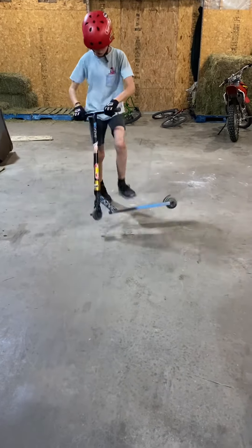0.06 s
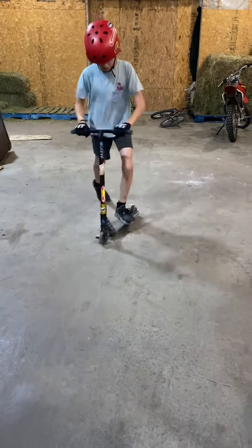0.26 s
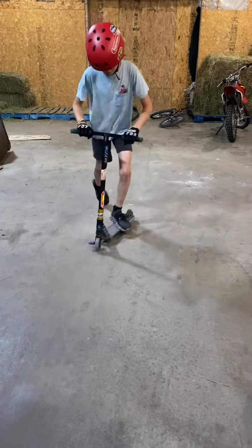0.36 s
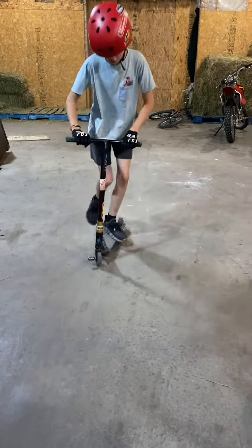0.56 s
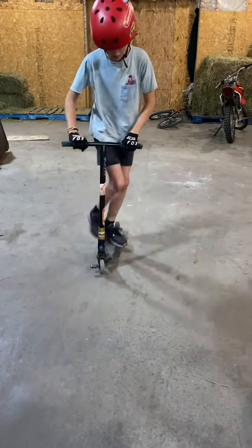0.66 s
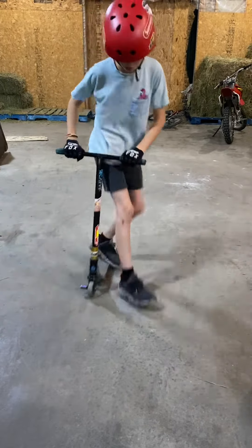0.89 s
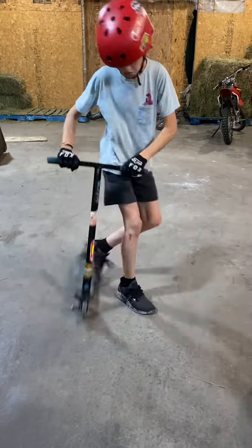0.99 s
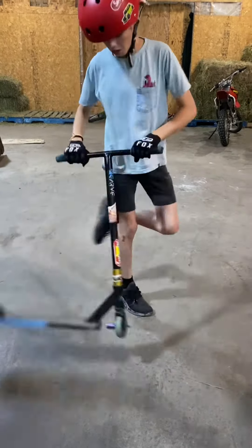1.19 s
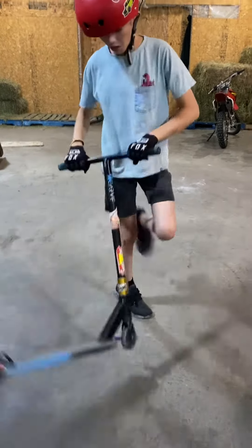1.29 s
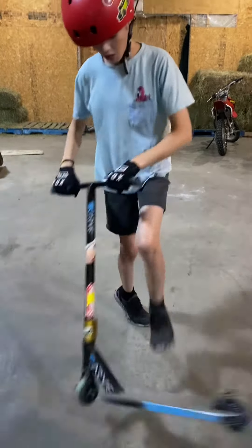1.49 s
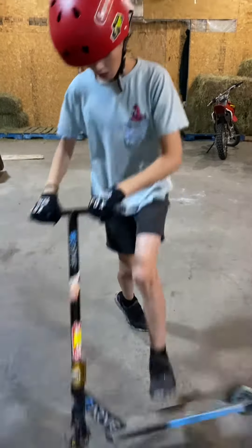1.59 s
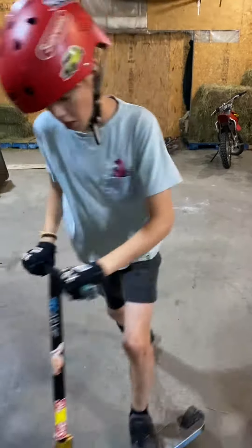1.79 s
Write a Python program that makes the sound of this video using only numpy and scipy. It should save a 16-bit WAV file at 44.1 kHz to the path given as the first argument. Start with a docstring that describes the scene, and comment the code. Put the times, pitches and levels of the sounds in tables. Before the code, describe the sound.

A stunt scooter's wheel and deck land with a tick and loud ringing clack, a shoe scuffs and slaps down, the wheel rolls over grit, then a second tighter clack; close phone stereo in an echoing barn.

```python
"""A barn with a concrete floor, a stunt scooter at work in it, heard by a pair of phone microphones.
Wheel and deck land twice, each a tick and then a hard clack; between them a shoe scuffs and slaps down,
and the front wheel rolls on over grit. Blows are bursts of contacts that set decaying modes ringing,
slaps are pulses falling in pitch, rolling and scuffing are dense grains, and the background is shaped
noise. Close echoes and a diffuse barn tail surround the blows, rings and slaps."""
import sys
import numpy as np
from scipy import signal
from scipy.fft import rfft, irfft, next_fast_len
from scipy.io import wavfile

SR = 44100
rng = np.random.default_rng(int(sys.argv[2]) if len(sys.argv) > 2 else 0)


def dump(signal):
    """Clip the signal to [-1, 1] and save it as 16-bit WAV at the path in sys.argv[1]."""
    limited = np.clip(np.atleast_2d(signal).T, -1, 1)
    pcm = np.round(limited * 32767).astype(np.int16)
    wavfile.write(sys.argv[1], SR, pcm)


def amplitude_ratio(level_db):
    """Convert a level in decibels to the matching linear amplitude (field) ratio."""
    exponent = np.asarray(level_db, float) / 20
    return 10 ** exponent


N = 81585  # length of the scene in samples

# Blows on the scooter: t/s, level/dB, contact length/s, contact pitch f/Hz,
# crack level/dB (against the body of the blow), room send level/dB (against the blow)
BLOWS = [(0.156, -37, 0.004, 1520, -6, 7), (0.16, -30.5, 0.0091, 2660, -2, 2),
         (0.163, -36.5, 0.014, 840, -7, 4), (0.182, -29.5, 0.0036, 2330, -24, 7),
         (0.2028, -10, 0.0049, 2490, -46, 1.5), (0.2083, -11, 0.0074, 1490, -1.5, -2),
         (0.891, -40, 0.0059, 2190, -38, 9), (0.932, -38.5, 0.047, 350, -34.5, -30),
         (1.245, -45, 0.00426, 610, -30, 3), (1.639, -31.5, 0.0047, 1020, -5.5, 11),
         (1.6438, -24, 0.0045, 4640, 8.5, -28), (1.649, -27.5, 0.01, 3300, -18, -10),
         (1.6712, -16, 0.0021, 2080, -24, 4.5), (1.675, -11, 0.0048, 2240, 1, -18),
         (1.680, -11.5, 0.0059, 1020, -2, -15.5)]
# Colour of the bright crack in a blow: f/Hz, level/dB
CRACK_COLOUR = [(500, -49.5), (2000, 14), (3200, -16.5), (5200, 12), (7500, 3.5), (10000, 9), (13000, 4.5),
                (16000, 5)]

# Free ringing of the deck, mode by mode: f/Hz
DECK_HZ = [846, 983, 1180, 1236, 1451, 1592, 1672, 1744, 2040, 2086, 2477, 2584, 3395]
# The same modes: level/dB (against the hit), T60/s
DECK_MODES = [(4, 0.15), (-10, 0.48), (-6.5, 0.39), (1, 0.38), (-1, 0.25), (-7.5, 0.45), (-5, 0.63),
              (7.5, 0.34), (-6.5, 0.51), (-0.5, 0.41), (4, 0.5), (-4.5, 0.57), (-5, 0.65)]
# Hits that set the deck ringing: t/s, level/dB
DECK_HITS = [(0.162, -50), (0.205, -27), (1.672, -45)]

# Wheel, fork and floor, damped by the rider's weight: f/Hz
FORK_HZ = [92, 148, 255, 320, 669, 1116, 1497, 1680, 1900, 2350]
# The same modes: level/dB (against the hit), T60/s
FORK_MODES = [(-14, 0.27), (-8.5, 0.13), (-10, 0.11), (6.5, 0.028), (7.5, 0.054), (10, 0.039),
              (-2.5, 0.078), (10.5, 0.033), (-7, 0.067), (0.5, 0.046)]
# Hits on wheel and fork: t/s, level/dB
FORK_HITS = [(1.645, -37), (1.676, -15)]

# Short knock of the scooter landing with no weight on it: f/Hz
KNOCK_HZ = [100, 365, 745, 840, 1185, 1440, 1705, 2505, 3310]
# The same modes: level/dB (against the hit), T60/s
KNOCK_MODES = [(-8, 0.25), (8.5, 0.046), (9, 0.042), (2, 0.051), (3.5, 0.066), (7, 0.055), (10.5, 0.056),
               (2.5, .06), (2, 0.056)]
# Unweighted landings: t/s, level/dB
KNOCK_HITS = [(0.16, -40), (0.2043, -17.5)]

# Brief single tones of loose parts: t/s, level/dB, f/Hz, rise time constant/s, T60/s
LOOSE_TONES = [(0.161, -27, 830, .002, .07), (1.078, -35, 975, .05, .21), (1.6435, -19, 4250, .0015, .025),
               (1.6645, -12, 2150, .003, .016)]

# Thumps of shoe and wheel: t/s, level/dB, starting f/Hz
SLAPS = [(0.161, -24, 1650), (0.206, -6, 1638), (0.9158, -17, 1585), (0.9230, -26, 1560),
         (0.932, -35, 1212), (0.966, -34, 1490), (0.986, -31, 1470), (1.644, -24, 1580),
         (1.6753, -10.5, 1616)]
# Hollow of the shoe: f/Hz
SOLE_HZ = [275, 420]
# The same modes: level/dB (against the hit), T60/s
SOLE_MODES = [(-4.5, 0.15), (4.5, 0.046)]
# Shoe coming down: t/s, level/dB
SOLE_HITS = [(0.917, -25.5)]

# Sole rubbing on the floor: t/s, level/dB
SCUFF_LEVEL = [(0, -56), (.05, -79), (.06, -49), (.075, -67), (.65, -71.5), (.69, -53.5), (.745, -63.5),
               (.81, -46), (.835, -51), (.875, -57), (.92, -48.5), (.97, -44), (1.03, -55.5), (1.15, -84),
               (1.55, -64.5), (1.59, -60.5), (1.62, -67), (1.85, -41.5)]
# Colour of the rubbing sole: f/Hz, relative level per Hz/dB
SCUFF_COLOUR = [(800, -31.5), (2500, -7), (4500, -6.5), (7000, -6), (10500, -9), (13000, -10),
                (16000, -9.5)]
# Wheel rolling on concrete: t/s, level/dB
ROLL_LEVEL = [(0, -54.5), (.15, -54.5), (.5, -68), (.87, -67.5), (.95, -46.5), (1.15, -51.5), (1.32, -55),
              (1.63, -54.5), (1.75, -48.5), (1.85, -46.5)]
# Colour of the rolling wheel: f/Hz, relative level per Hz/dB
ROLL_COLOUR = [(100, -49), (250, 2), (500, 1), (900, 1), (1900, -4), (2600, -11), (5000, -13.5),
               (10000, -19), (16000, -28.5)]

# Low background of the barn: t/s, level/dB
AIR_LEVEL = [(0.0, -62), (0.21, -68), (0.344, -49), (0.756, -64.5), (0.906, -66.5), (1.118, -63),
             (1.504, -60), (1.69, -71), (1.85, -53)]
# Colour of that background: f/Hz, relative level per Hz/dB
AIR_COLOUR = [(20, -35), (40, -20), (70, -5.5), (145, -6), (220, -14), (400, -17), (900, -32), (2700, -37),
              (6000, -20.5), (11000, -50), (16000, -58.5)]

# Decay of the barn's reflections: f/Hz, T60/s
BARN_T60 = [(60, 0.31), (160, 0.68), (420, 0.36), (1100, 0.56), (2900, 0.71), (6000, 0.7), (10500, 0.57),
            (16000, 1)]
# Colour of the barn's reflections at their start: f/Hz, relative level/dB
BARN_COLOUR = [(60, -7), (200, -1.5), (500, 2.5), (1500, 0.5), (3000, -2), (8000, 10), (16000, -24)]

# Left-right likeness by band, set near 1 in much of the treble so that the notches
# in the sum of left and right are deep: f/Hz, likeness (1 = alike)
LIKENESS = [(60, .99), (250, .96), (600, .8), (1700, .96), (3000, .45), (5000, .75), (6500, .9),
            (7300, .995), (9000, .93), (13500, .99), (16000, .9)]
# Level balance of the pair: f/Hz, left minus right level/dB
BALANCE = [(60, 3.5), (240, -2), (950, -1), (3800, -1), (15000, -0.5)]
# Phase of left over right, stepped so that the two cancel in broad notches
# near 7 and 14 kHz when summed: f/Hz, phase/rad
PHASE_STEPS = [(0, 0), (1900, 0), (3000, .7), (5300, .5), (7000, 3.0), (7900, 3.3), (9900, 6.1),
               (11000, 6.5), (12800, 9.2), (14400, 9.7), (16400, 12.6), (22050, 18)]

DAMPED_ROUGH = 0.2  # waver of the short rings, as a share of their swing


def at_hz(points, hz):
    """Reads a table at the given frequencies, along a logarithmic axis."""
    f, value = np.array(points, float).T
    return np.interp(np.log(np.maximum(hz, 1)), np.log(f), value)


def in_time(rows):
    """Draws a table of times and values as a line over the whole scene."""
    s, value = np.transpose(rows)
    return np.interp(np.arange(N) / SR, s, value)


def rms_one(x):
    """Scales a signal to an rms of one."""
    return x / np.sqrt(np.mean(x ** 2) + 1e-20)


def drift(rate):
    """Slow random wandering of rms 1: noise through two equal low-pass poles at rate, in Hz."""
    hold = 40  # samples between computed points
    r = np.exp(-2 * np.pi * rate * hold / SR)
    noise = rng.standard_normal(N // hold + 2002)
    slow = signal.lfilter([1], [1, -2 * r, r * r], noise)[2000:]  # let the filter settle first
    return np.interp(np.arange(N) / hold, np.arange(len(slow)), rms_one(slow))


def colour(x, spectrum):
    """Shapes a signal by a spectrum in dB, without shifting its phase."""
    n = x.shape[-1]
    return irfft(rfft(x) * amplitude_ratio(at_hz(spectrum, np.fft.rfftfreq(n, 1 / SR))), n)


def widen(mid, side):
    """Makes left and right from two signals, as alike in each band as LIKENESS sets."""
    n = mid.shape[-1]
    alike = np.clip(at_hz(LIKENESS, np.fft.rfftfreq(n, 1 / SR)), 0, 1)
    m = rfft(mid) * np.sqrt((1 + alike) / 2)
    s = rfft(side) * np.sqrt((1 - alike) / 2)
    return irfft(np.array([m + s, m - s]), n)


def grains(per_s, spread_db, size):
    """Clicks at random times, of random sign and uneven size."""
    sizes = amplitude_ratio(spread_db * np.minimum(rng.exponential(1, size), 5))
    signs = rng.choice([-1, 1], size)
    return sizes * signs * (rng.random(size) < per_s / SR)


def place(track, s, sound):
    """Adds a sound to a track from time s."""
    start = int(s * SR)
    return track + np.pad(sound, (start, N))[:N]


def ringing(pitches, modes, hits, contact_s, rough):
    """Every hit drives every decaying mode, with a strength and phase of its own; loose parts waver it."""
    out, t = np.zeros(N), np.arange(N) / SR
    rough_hz, strength_spread_db = 22, 2
    for hz, (mode_db, t60) in zip(pitches, modes):
        waver = 1 + rough * (drift(rough_hz) + 1j * drift(rough_hz))  # in level and phase
        chances = rng.random((len(hits), 2))
        for (s, db), (chance, turn) in zip(hits, chances):
            age = np.maximum(t - s, 0)
            onset = 1 - np.exp(-age / contact_s)  # zero before the hit
            swing = np.imag(waver * np.exp(2j * np.pi * (hz * age + turn)))
            strength_db = db + mode_db + strength_spread_db * (chance - 0.5)
            out += amplitude_ratio(strength_db - 60 * age / t60) * swing * onset
    return out


def blows():
    """Each blow rattles through a broad resonance plus a bright crack; the room gets one click of both."""
    dry, sent, t = np.zeros(N), np.zeros(N), np.arange(4096) / SR
    rise_s, contacts_per_s = 0.0009, 9000
    band_ratio = 1.4  # band edges lie at the contact pitch divided and multiplied by this
    lead = 512  # samples kept ahead of the click, as colour() spreads both ways
    click = np.zeros(len(t))
    click[lead] = 1
    for s, db, length, hz, crack_db, room_db in BLOWS:
        shape = (1 - np.exp(-t / rise_s)) * np.exp(-(t / length) ** 2)
        rattle = grains(contacts_per_s, spread_db=2.5, size=(2, len(t)))
        rattle = rattle + 0.25 * rng.standard_normal((2, len(t)))
        edges = [hz / band_ratio, hz * band_ratio]
        band = signal.butter(2, edges, "band", fs=SR, output="sos")
        size = amplitude_ratio(db) * np.sqrt(np.mean(shape ** 2))

        body = rms_one(signal.sosfilt(band, rattle[0] * shape))
        crack = rms_one(shape * colour(rattle[1], CRACK_COLOUR))
        dry = place(dry, s, size * (body + amplitude_ratio(crack_db) * crack))

        room_body = rms_one(signal.sosfilt(band, click))
        room_crack = rms_one(colour(click, CRACK_COLOUR))
        room_click = room_body + amplitude_ratio(crack_db) * room_crack
        # the click falls half a contact length into the blow
        sent = place(sent, s - lead / SR + length / 2, amplitude_ratio(room_db) * size * room_click)
    return dry, sent


def deck_ring():
    """The deck rings on freely in long, rough modes after a hit."""
    return ringing(DECK_HZ, DECK_MODES, DECK_HITS, contact_s=0.0013, rough=0.38)


def fork_ring():
    """Wheel, fork and floor ring in modes that the rider's weight damps."""
    return ringing(FORK_HZ, FORK_MODES, FORK_HITS, contact_s=0.0012, rough=DAMPED_ROUGH)


def unweighted_knock():
    """The scooter landing with no weight on it knocks in short modes."""
    return ringing(KNOCK_HZ, KNOCK_MODES, KNOCK_HITS, contact_s=0.0027, rough=DAMPED_ROUGH)


def loose_parts():
    """Loose parts each sound one brief decaying mode."""
    out = np.zeros(N)
    for s, db, hz, rise_s, t60 in LOOSE_TONES:
        out = out + ringing([hz], [(db, t60)], [(s, 0)], rise_s, DAMPED_ROUGH)
    return out


def slaps():
    """Shoe and wheel thump in pulses that fall in pitch: the treble arrives first, the bass trails."""
    out, t = np.zeros(N), np.arange(8192) / SR
    sag_s, rise_s = 0.0009, 0.000049  # the pitch has halved after sag_s
    for s, db, hz in SLAPS:
        turns = hz * sag_s * np.log1p(t / sag_s)
        # two losses add up: 60 dB per 0.085 s and 2.5 dB per turn
        fade = amplitude_ratio(db - 60 * t / 0.085 - 2.5 * turns)
        onset = 1 - np.exp(-t / rise_s)
        out = place(out, s, -fade * onset * np.sin(2 * np.pi * turns))
    return out


def shoe_hollow():
    """The hollow of the shoe booms in two damped modes as it comes down."""
    return ringing(SOLE_HZ, SOLE_MODES, SOLE_HITS, contact_s=0.00063, rough=DAMPED_ROUGH)


def rubbing(level, spectrum, per_s):
    """Grit under a wheel or sole: dense grains over a little noise, wavering in level by 1 dB rms."""
    grit = grains(per_s, spread_db=2.8, size=(2, N))
    grit = grit + 0.3 * rng.standard_normal((2, N))
    mid, side = colour(grit, spectrum)
    return amplitude_ratio(in_time(level) + drift(45)) * rms_one(widen(mid, side))


def wheel_roll():
    """The front wheel rolls over grit on the concrete."""
    return rubbing(ROLL_LEVEL, ROLL_COLOUR, per_s=3500)


def sole_scuff():
    """The sole rubs on the floor in swells of brighter, denser grains."""
    return rubbing(SCUFF_LEVEL, SCUFF_COLOUR, per_s=6000)


def barn_air():
    """The barn's background is coloured noise, its level wandering by 1 dB rms."""
    mid, side = colour(rng.standard_normal((2, N)), AIR_COLOUR)
    return amplitude_ratio(in_time(AIR_LEVEL) + drift(14)) * rms_one(widen(mid, side))


def near(x):
    """Direct sound: floor echoes right by the microphones make the two sides differ."""
    t = np.arange(512) / SR
    scatter = rng.standard_normal(len(t)) * np.exp(-t / 0.015)
    scatter = scatter / np.sqrt(np.sum(scatter ** 2))
    echoes = np.convolve(x, scatter)[:N]
    return widen(x, amplitude_ratio(-4) * echoes)


def barn(x):
    """Distant sound: dense reflections, a noise tail that dies band by band."""
    t, tail = np.arange(SR) / SR, 0
    edges = 45 * 2 ** np.arange(0, 8.6, 0.5)  # half octaves, Hz
    white = rng.standard_normal((2, 2, SR))
    for k, (low, high) in enumerate(zip(edges, edges[1:])):
        hz = np.sqrt(low * high)
        sos = signal.butter(2, [low, high], "band", fs=SR, output="sos")
        band = signal.sosfilt(sos, white[k % 2])  # neighbouring bands use separate noise
        tail = tail + band * amplitude_ratio(at_hz(BARN_COLOUR, hz) - 60 * t / at_hz(BARN_T60, hz))
    build_up_s = 0.0083
    tail = tail * np.clip(t / build_up_s, 0, 1) ** 2
    tail = widen(*tail) / np.sqrt(np.sum(tail[0] ** 2))
    return signal.fftconvolve(x[None], tail, axes=1)[:, :N]


def scene():
    """Sets scooter and shoe near the pair and in the barn, over the rolling, scuffing and background."""
    dry, sent = blows()
    deck = deck_ring()
    damped = fork_ring() + unweighted_knock() + loose_parts()
    shoe = slaps() + shoe_hollow()
    sent = sent + amplitude_ratio(-4.5) * deck + amplitude_ratio(-20) * damped + amplitude_ratio(-7) * shoe
    direct = near(dry + deck + damped + shoe)
    return direct + barn(sent) + wheel_roll() + sole_scuff() + barn_air()


def top_cut(x):
    """Nothing passes above the cut-off."""
    return signal.sosfilt(signal.butter(12, 16810, fs=SR, output="sos"), x)


def record(dry):
    """Left and right are set apart in level and phase; bass rolls off, peaks round over, the top is cut."""
    n = next_fast_len(N + 2048)
    hz = np.fft.rfftfreq(n, 1 / SR)
    # each side takes half of the difference
    level = amplitude_ratio(at_hz(BALANCE, hz) / 2)
    phase = np.exp(0.5j * np.interp(hz, *np.transpose(PHASE_STEPS)))
    left = level * phase
    x = irfft(rfft(dry, n) * np.array([left, 1 / left]), n)[:, :N]
    x = signal.sosfilt(signal.butter(2, 16, "high", fs=SR, output="sos"), x)
    ceiling = 0.99  # of full scale
    x = ceiling * np.tanh(x / ceiling)
    x = signal.sosfilt(signal.cheby2(12, 60, 16700, fs=SR, output="sos"), x)
    return top_cut(x)


dry = scene()
out = record(dry)
dump(out)
```